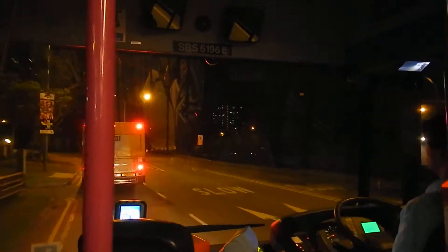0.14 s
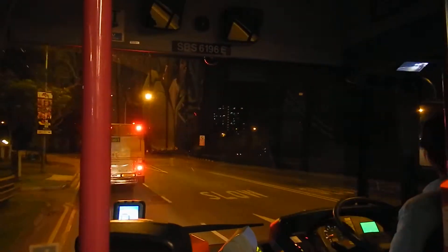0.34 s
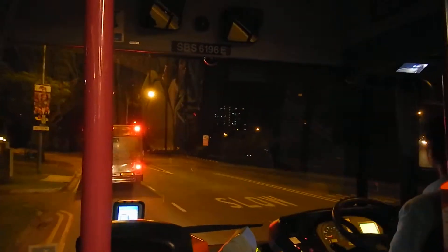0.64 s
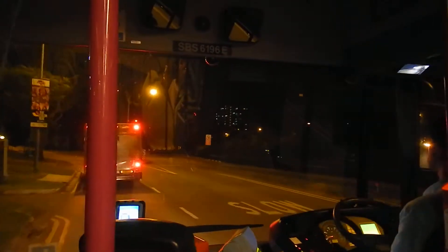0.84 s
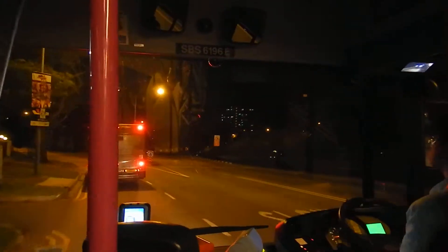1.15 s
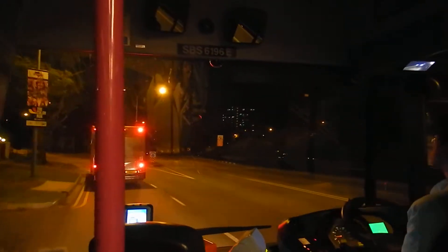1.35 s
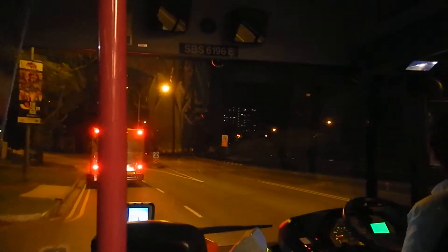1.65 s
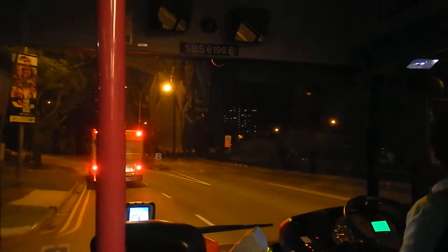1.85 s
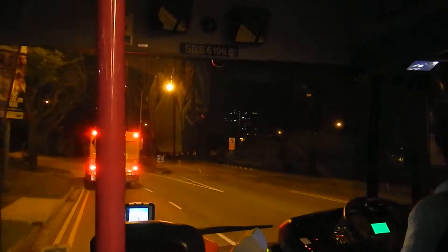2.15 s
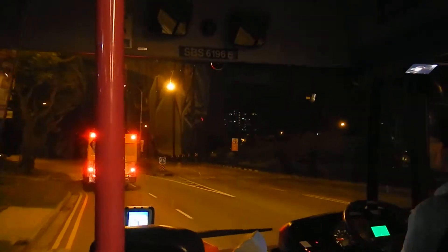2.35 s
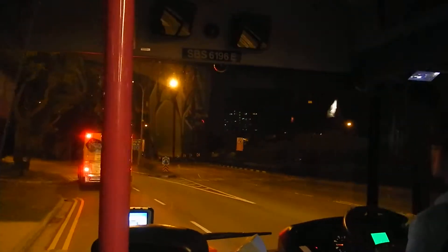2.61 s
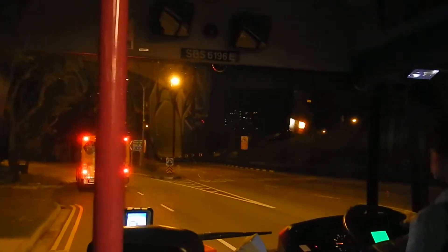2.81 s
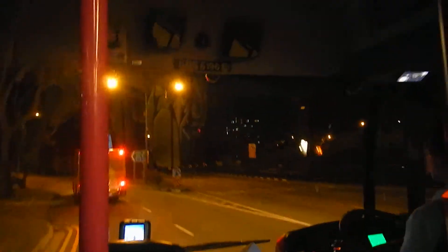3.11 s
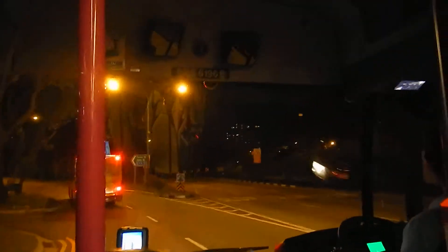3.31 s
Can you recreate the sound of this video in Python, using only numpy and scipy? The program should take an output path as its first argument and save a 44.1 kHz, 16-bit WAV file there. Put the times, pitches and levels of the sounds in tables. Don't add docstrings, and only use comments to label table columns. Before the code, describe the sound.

Inside a moving bus, a deep engine hum climbs then eases at the end; road rumble and soft air hiss continue while bumps thud and loose panels chatter, busiest midway, then a faint whistle.

```python
import sys
import numpy as np
from scipy import signal
from scipy.fft import rfft, irfft, next_fast_len
from scipy.io import wavfile
from scipy.ndimage import uniform_filter1d, map_coordinates

SR = 44100
rng = np.random.default_rng(int(sys.argv[2]) if len(sys.argv) > 2 else 0)


def to_wav(s):
    ch = np.atleast_2d(s).T
    pcm = np.round(np.clip(ch, -1, 1) * 32767)
    wavfile.write(sys.argv[1], SR, pcm.astype(np.int16))


def magnitude_from_level(level_db):
    exponent = np.asarray(level_db, float) / 20
    return 10 ** exponent


N = 153027


def unit(x):
    return x / np.sqrt(np.mean(x ** 2) + 1e-20)


def along(points, hz):
    f, v = np.transpose(points)
    return np.interp(np.log(hz + 1), np.log(f + 1), v)


def curves(rows):
    s, *cols = np.transpose(rows)
    return [np.interp(np.arange(N) / SR, s, c) for c in cols]


def wobble(rate):
    return map_coordinates(rng.standard_normal(400), [np.arange(N) * rate / SR])


def filtered(x, response):
    m = next_fast_len(N + SR // 2)
    return irfft(rfft(x, m) * response(np.fft.rfftfreq(m, 1 / SR)), m)[..., :N]


def ring(x, hz, width, db):
    def mode(f):
        return 1j * f * width / (hz * hz - f * f + 1j * f * width)
    return magnitude_from_level(db) * unit(filtered(x, lambda f: mode(f) ** 2))


def ports(pair, spectrum):
    # frequency in Hz, side level over mid in dB.
    side_db = [(30, -14), (100, -24), (280, -26), (760, -19), (2100, -10.5), (3500, -5.5), (5800, -2.5),
               (8500, 1)]
    mid, side = filtered(pair, lambda hz: magnitude_from_level(along(spectrum, hz)) * [1 + 0 * hz, magnitude_from_level(along(side_db, hz))])
    return np.array([mid + side, mid - side]) / np.sqrt(np.mean(mid ** 2))


def rush(spectrum, patchy_db):
    z = signal.stft(rng.standard_normal((2, N)), nperseg=512)[2]
    field = uniform_filter1d(rng.standard_normal(z.shape[1:]), size=5, axis=0)
    field = uniform_filter1d(field, size=12, axis=1)
    noise = signal.istft(z * magnitude_from_level(patchy_db * unit(field)), nperseg=512)[1][:, :N]
    return ports(noise, spectrum)


def vents():
    # frequency in Hz, level in dB.
    hiss_spectrum = [(1300, -55), (2200, 0), (2900, 1.5), (4500, -2), (5700, -3), (6250, -2.5), (6650, -28),
                     (8000, -78)]
    air_spectrum = [(5500, -45), (6400, -22), (6800, -1.5), (7900, -3), (8300, -5), (10000, -14),
                    (15700, -20), (16500, -60)]
    # frequency in Hz, width in Hz, level in dB.
    duct_mode = (411, 28, -36)
    # time in seconds, level in dB.
    duct_levels = [(0, -18), (.45, -24.5), (.75, -29.5), (1.2, -28), (1.6, -35.5), (2.0, -23), (2.4, -26),
                   (3.0, -20.5), (3.47, -26)]
    hum_db, = curves(duct_levels)
    air = magnitude_from_level(-62) * rush(air_spectrum, patchy_db=1.2)
    hiss = magnitude_from_level(-40 + 0.55 * wobble(8.67)) * rush(hiss_spectrum, patchy_db=1.5)
    hum = magnitude_from_level(hum_db - hum_db.mean() + wobble(4.5)) * ring(rng.standard_normal(N), *duct_mode)
    return hiss + air + hum


def squeak():
    # start in seconds, length in seconds, frequency in Hz, level in dB.
    whistle = (3.12, .24, 1145, -35)
    s, length, hz, db = whistle
    u = np.clip((np.arange(N) / SR - s) / length, 0, 1)
    swell = np.sqrt(np.abs(np.sin(np.pi * u)))
    phase = 2 * np.pi * np.cumsum(hz + 12 * np.exp(-u / 0.35)) / SR
    return magnitude_from_level(db + 1.5 * wobble(5.6)) * swell * np.sin(phase)


def road():
    # time in seconds, level in dB.
    roar_levels = [(0.0, -25.5), (1.03, -25), (1.6, -23.5), (2.56, -24), (2.73, -22.5), (3.3, -25),
                   (3.47, -23.5)]
    # frequency in Hz, level in dB.
    rumble_spectrum = [(20, -9), (27, -30), (42, -13), (60, -4.5), (113, -3.5), (140, -1.5), (172, -7.5),
                       (280, -12.5), (400, -113)]
    roar_spectrum = [(160, -55), (270, -22.5), (325, -2.5), (407, -2.5), (455, -6), (692, -5.5), (923, -10),
                     (1640, -14), (2500, -24), (3250, -44), (5500, -120)]
    thud_spectrum = [(20, -20), (28, -4), (42, -7), (100, 7.5), (200, -2), (370, -9.5), (650, -15),
                     (1500, -67)]
    # time in seconds, level in dB.
    bumps = [(.3, -24.5), (1.47, -20), (1.57, -23), (1.97, -20), (2.12, -23), (2.35, -19), (2.6, -24.5),
             (2.85, -19.5), (2.99, -18.5), (3.42, -30)]
    # time in seconds, level in dB, frequency in Hz.
    body_booms = [(.3, -18, 136), (.85, -26, 134.2), (1.12, -27.5, 138), (1.47, -20.5, 94.8),
                  (1.56, -28, 27), (1.57, -21, 132), (1.93, -17, 133), (1.98, -30, 59.7), (2.4, -24, 58),
                  (2.4, -31, 28), (3.05, -35, 29), (3.38, -22.5, 73.4)]
    bump_s, boom_s = 0.053, 0.097
    roar_db, = curves(roar_levels)
    t = np.arange(N) / SR
    thud = sum(magnitude_from_level(db) * np.exp(-((t - s) / bump_s) ** 2) for s, db in bumps)
    rumble_db = -24 + 1.2 * (roar_db - roar_db.mean()) + 0.21 * wobble(4.9)
    rumble = magnitude_from_level(rumble_db) * rush(rumble_spectrum, patchy_db=0.5)
    heave = 0
    for s, db, hz in body_booms:
        heave = heave + magnitude_from_level(db) * np.exp(-((t - s) / boom_s) ** 2) * np.sin(2 * np.pi * hz * t)
    roar = magnitude_from_level(roar_db + 0.42 + 1.03 * wobble(8.9)) * rush(roar_spectrum, patchy_db=-0.23)
    return heave + rumble + roar + thud * rush(thud_spectrum, patchy_db=-2.0)


def rattles():
    # time in seconds, peak level in dB, then fizz, knock and
    # sizzle, each in dB over the peak.
    early_shakes = [(0.0904, -40, -28, -2, -37), (0.2696, -24, -29.5, 1, -39),
                    (0.3424, -28.5, -28, 3, -37.5), (0.4476, -23.5, -32, -0.5, -42),
                    (0.6204, -44, -30, -2, -39), (0.6844, -35, -26, -4, -35), (0.7193, -28.5, -29, 2, -34),
                    (0.7684, -27, -25, 6.5, -32), (0.7884, -25.5, -25.5, 1, -35.5),
                    (0.869, -21.5, -30, -5, -41), (0.9348, -22, -26, -0.5, -36),
                    (0.9464, -18, -31, -3, -40), (0.998, -32, -31, 3, -39), (1.1874, -40, -27, 0, -30),
                    (1.2151, -27.5, -25, 6, -31), (1.2953, -16.5, -31, -2.5, -42),
                    (1.4244, -26, -30, -1.5, -37), (1.4525, -22.5, -26, 0, -37),
                    (1.527, -17, -28.5, 0.5, -45), (1.587, -20, -31, -7.5, -42),
                    (1.6317, -16.5, -32, 0.5, -42.5), (1.6674, -16.5, -28, -5, -40),
                    (1.7924, -24.5, -33.5, -3, -43), (1.8584, -25.5, -33, 0, -40),
                    (2.0009, -23.5, -32, 6, -43.5)]
    late_shakes = [(2.179, -25, -19.5, -0.5, -34), (2.2184, -26.5, -20, -3, -32),
                   (2.2384, -22, -27.5, 0.5, -45), (2.26, -14.5, -30.5, 0.5, -43),
                   (2.299, -20.5, -25.5, -7, -35), (2.3288, -17, -27, -3.5, -41),
                   (2.3684, -37, -28, 0, -41), (2.4284, -31, -31, -11, -43), (2.4783, -18, -31, -2, -50),
                   (2.5434, -23.5, -30, -5, -41), (2.5594, -22, -25.5, -15.5, -40),
                   (2.585, -12, -25, 0, -45), (2.6354, -22, -29, -8.5, -41),
                   (2.6863, -12.5, -28.5, 0.5, -45), (2.7295, -21.5, -26, -11, -44),
                   (2.7843, -15, -30, -2.5, -45), (2.8284, -28.5, -30, 3, -44), (2.8794, -24, -33, 4, -41),
                   (2.9494, -29.5, -23, 1, -37.5), (3.1394, -33, -27, -1, -40),
                   (3.2784, -36.5, -31, 1, -41), (3.3114, -32.5, -29, 7, -39)]
    # frequency in Hz, level in dB.
    panel_spectrum = [(1200, -90), (1700, -28), (2300, 1.5), (3000, 1.5), (4600, -1), (5600, 2),
                      (6250, -3.5), (6750, -32), (8000, -100)]
    knock_spectrum = [(350, -80), (600, -23), (1000, 0.5), (1500, 9.5), (2100, 4), (2700, -28),
                      (4000, -100)]
    fizz_spectrum = [(4500, -100), (5800, -35.5), (6500, 9), (6900, 0.5), (7900, 1.5), (8400, -3.5),
                     (9500, -12.5), (10500, -30), (12500, -90)]
    sizzle_spectrum = [(6500, -90), (8500, -25), (9800, 0), (12000, -4), (14500, -10), (16000, -16)]
    # frequency in Hz, width in Hz, level in dB.
    panel_modes = [(1560, 60, -3), (1775, 50, -3), (2057, 50, -2), (2354, 45, -1), (2832, 35, -1),
                   (3511, 40, -3), (3820, 40, -3), (4027, 45, -2), (4418, 55, -2), (5412, 30, 1),
                   (5610, 35, -1), (5824, 35, -1), (7850, 120, 0)]
    rise_s, hold_s, fall_s, fizz_spread_s = .005, .016, .013, 0.016
    taps_per_s, tap_spread_db = 2000, 3.5
    wet_db, t60_s = -2, .3
    lean_db = -0.7

    s, db, fizz_db, knock_db, sizzle_db = np.transpose(early_shakes + late_shakes)
    t = np.arange(N) / SR
    coarse = t[::16]
    u = coarse - s[:, None]
    attack = (u > -rise_s) * np.minimum(u / rise_s / 2 + .5, 1) ** 2
    shape = attack * np.exp(-np.maximum(u - hold_s, 0) / fall_s * 2)
    soft = np.exp(-((u - hold_s / 2) / fizz_spread_s) ** 2)

    draw = rng.random((2, N))
    taps = (draw[0] < taps_per_s / SR) * magnitude_from_level(-tap_spread_db * np.log(draw[1] + 1 / 20))
    grain = unit(.5 + uniform_filter1d(unit(taps), size=24))
    fade = magnitude_from_level(-60 * coarse / t60_s) ** 2
    layers = [(-10.5, shape, panel_spectrum),
              (knock_db - 10.5, shape, knock_spectrum),
              (fizz_db - 4, soft, fizz_spectrum),
              (sizzle_db - 4, soft, sizzle_spectrum)]
    out = 0
    for level_db, form, colour in layers:
        power = magnitude_from_level(db + level_db) ** 2 @ form
        echo = magnitude_from_level(wet_db) ** 2 * np.abs(signal.fftconvolve(power, fade / fade.sum())[:len(power)])
        direct = np.interp(t, coarse, np.sqrt(power))
        tail = np.interp(t, coarse, np.sqrt(echo))
        shake = np.hypot(direct * grain, tail) * rng.standard_normal((2, N))
        out = out + ports(shake, colour) * np.sqrt(np.mean(direct ** 2))

    def modes(f):
        return 1 + sum(magnitude_from_level(g) * 1j * f * w / (c * c - f * f + 1j * f * w) for c, w, g in panel_modes)
    return filtered(out, modes) * magnitude_from_level([[lean_db], [-lean_db]])


def engine():
    # time in seconds, firing rate in Hz.
    speed = [(0, 30.8), (.3, 31.7), (.75, 33.4), (1.05, 34.2), (1.5, 35.6), (1.8, 37.3), (2.1, 38.8),
             (2.4, 40.2), (2.7, 41.3), (2.85, 41.7), (3.05, 41), (3.47, 38.6)]
    # time in seconds, level in dB.
    effort = [(0, -30.5), (.2, -27), (.45, -22.5), (.75, -21), (.92, -34), (1.3, -29), (1.7, -32.5),
              (2.05, -30), (2.4, -26), (2.7, -23.5), (3.0, -22.5), (3.25, -31), (3.47, -28.5)]
    # order in cycles per turn, level in dB, share of the effort swing (ratio).
    orders = [(5, -8, .3), (6, -1, .5), (7, -9, .4), (8, -12, .15), (9, 1, .95), (10, -2, .4),
              (12, -3.5, 0), (14, -9, .4), (15, -15, .4)]
    # frequency in Hz, gain in dB.
    cabin_gain = [(62, -4.5), (83, 4), (98, 1), (110, 2.5), (124, 1), (138, 0), (153, -2), (190, -0.5)]
    waver_db, jitter = 2.2, .004
    (firing_hz,), (effort_db,) = curves(speed), curves(effort)
    mean_db = effort_db.mean()
    out = np.zeros(N)
    for order, db, share in orders:
        hz = firing_hz / 3 * order * (1 + jitter * wobble(6))
        level_db = db + mean_db + share * (effort_db - mean_db)
        level_db = level_db + along(cabin_gain, hz) + waver_db * wobble(7.2)
        turns = np.cumsum(hz) / SR + rng.random()
        out += np.sqrt(2) * magnitude_from_level(level_db) * np.sin(2 * np.pi * turns)
    return out


def scene():
    left_db = 0.3
    return (vents() + squeak() + road() + rattles() + engine()) * magnitude_from_level([[left_db], [-left_db]])


def roll_off(x):
    return signal.sosfilt(signal.butter(12, 15790, fs=SR, output="sos"), x)


def record(dry):
    # centre in Hz, width in Hz.
    notches = [(2500, 110), (3188, 330), (5000, 270)]

    def notch(f):
        return np.prod([(c * c - f * f) / (c * c - f * f + 1j * f * w) for c, w in notches], axis=0)
    return roll_off(filtered(dry, notch))


dry = scene()
out = record(dry)
to_wav(out)
```